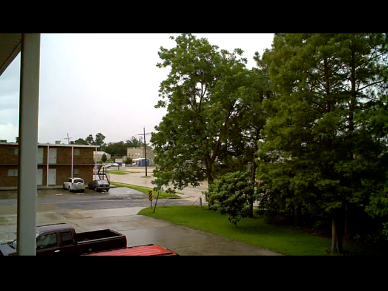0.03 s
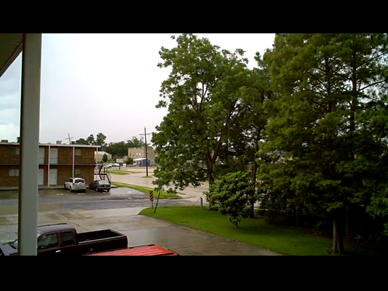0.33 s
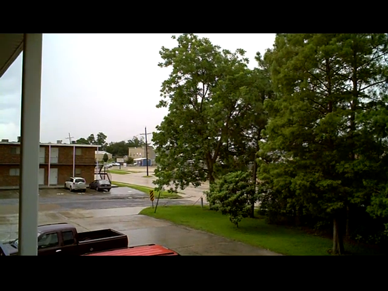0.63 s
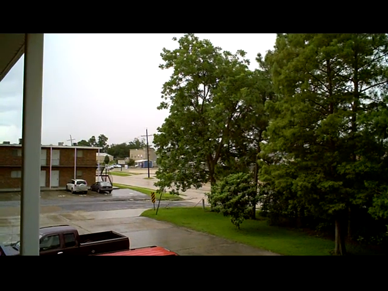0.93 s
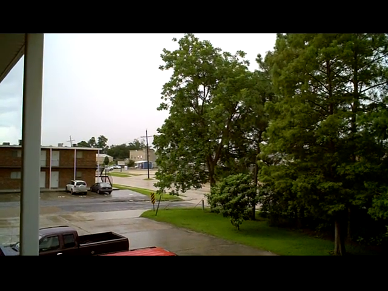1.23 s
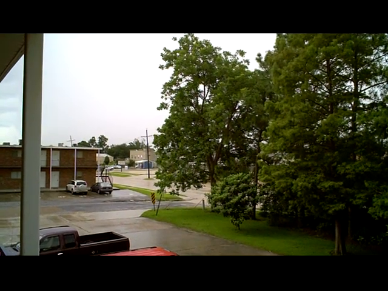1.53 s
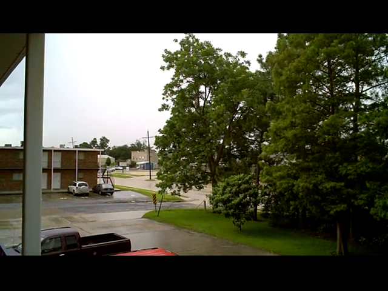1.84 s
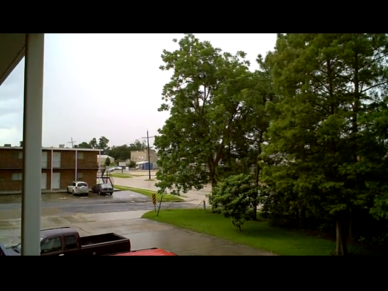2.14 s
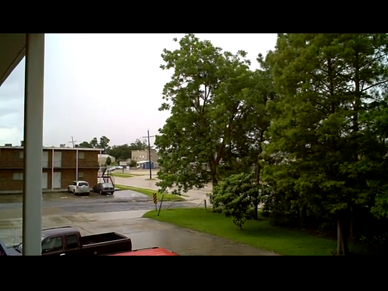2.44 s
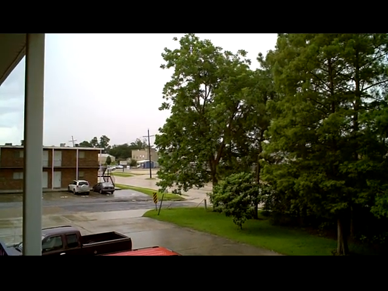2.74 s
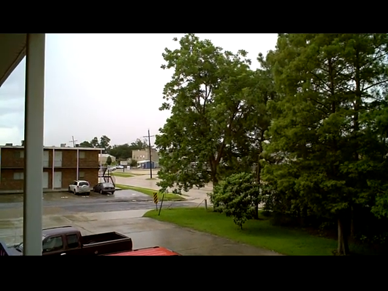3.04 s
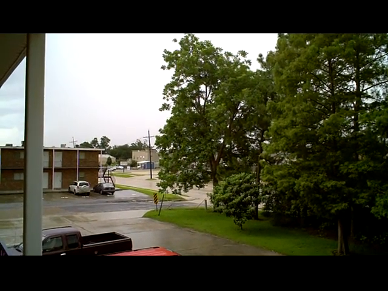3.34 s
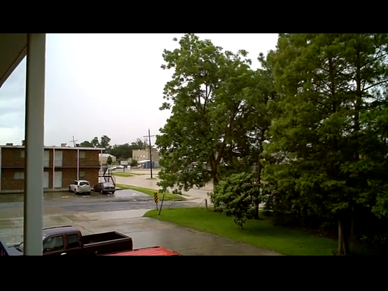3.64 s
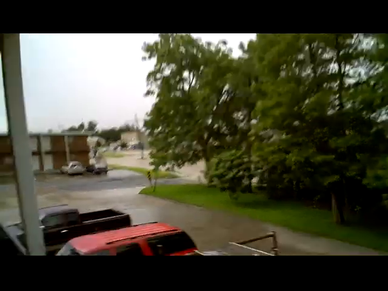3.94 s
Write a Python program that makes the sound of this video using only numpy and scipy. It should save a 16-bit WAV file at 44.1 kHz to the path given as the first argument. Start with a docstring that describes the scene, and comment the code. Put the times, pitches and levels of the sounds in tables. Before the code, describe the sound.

A close thunder crack bursts suddenly after a few seconds of soft, steady rain.

```python
"""A very near lightning strike in steady rain, heard from a porch.
Rain washes over a street and trees, low wind gusts, a few drops splash close by.
Sparks rise to a sizzle and end in two sharp snaps; buildings scatter them and the porch rings.
Then shock waves from along the channel pile up, overload the microphone and briefly pin it silent."""
import sys
import numpy as np
from scipy import signal
from scipy.fft import rfft, irfft, next_fast_len
from scipy.io import wavfile

SR = 44100
rng = np.random.default_rng(int(sys.argv[2]) if len(sys.argv) > 2 else 0)


def pcm_store(signal):
    """Save signal as 16-bit PCM."""
    levels = np.round(np.clip(np.atleast_2d(signal), -1, 1) * 32767)
    wavfile.write(sys.argv[1], SR, levels.astype(np.int16).T)


N = 176400
TIME_S = np.arange(N) / SR

# distant rain: freq_hz, relative_db
WASH_SPECTRUM = [(40, 7), (80, 3.5), (340, 3), (650, 0), (860, -0.5), (1000, -3.5), (1380, -7), (1630, -7),
                 (1830, -11.5), (2400, -17.5), (3400, -20), (5300, -26.5), (8000, -30), (12000, -36),
                 (15500, -36)]
# distant rain: time_s, level_db
WASH_ENVELOPE = [(.17, -39), (.55, -38.5), (1.28, -40), (1.65, -39), (1.88, -40), (2.05, -39), (2.2, -40),
                 (2.95, -40.3), (3.7, -39.5)]
# small drops on paving: freq_hz, relative_db
PATTER_SPECTRUM = [(500, 4), (1500, -2), (3500, -7), (6000, -3.5), (9000, -14), (12000, -17), (15500, -19)]
# faint tones in the wash: pitch_hz, width_hz, level_db
WASH_TONES = [(238.7, 15, -53), (497.5, 37, -56), (823, 32, -62.5), (5330, 260, -75)]
# wind rush: freq_hz, relative_db
WIND_SPECTRUM = [(40, -7), (130, -10.5), (180, -2.5), (235, -1.5), (290, -1.5), (320, -11), (450, -17.5),
                 (1000, -32.5), (4000, -68)]
# gusts: time_s, level_db
GUST_ENVELOPE = [(.17, -43.5), (.85, -39.5), (1.05, -43), (1.2, -41.5), (1.37, -47), (1.55, -44),
                 (1.87, -47), (2.3, -42.5), (2.7, -52), (2.82, -44), (3.05, -48), (3.7, -43.5)]
# near drops: start_s, relative_db, centre_hz
NEAR_DROPS = [(.559, -48, 5800), (.615, -55, 9000), (.861, -47, 13000), (.917, -53, 7500),
              (1.233, -48, 6500), (1.321, -48, 5400), (1.447, -48, 8000), (1.492, -47, 7500),
              (1.541, -53, 10000), (1.575, -47, 5600), (1.682, -44, 7000), (1.788, -44, 9500),
              (2.344, -51, 7500), (2.685, -48, 6300), (2.778, -44, 10500), (3.026, -46, 7500),
              (3.386, -49, 6500), (3.460, -47, 8500)]
# sparks before the strike: time_s, level_db
SIZZLE_ENVELOPE = [(3.57, -93), (3.61, -69), (3.655, -55), (3.675, -51), (3.716, -48.5), (3.74, -70)]
# sparks: freq_hz, relative_db
SIZZLE_SPECTRUM = [(300, -16), (1500, 1), (4000, 2), (10000, -5), (15500, -7)]
# discharge snaps: start_s, level_db, length_s
SNAP_BURSTS = [(3.7076, -41, .0008), (3.718, -17.5, .001), (3.7561, -22, .0006), (3.757, -29, .0025)]
# snaps: freq_hz, relative_db
SNAP_SPECTRUM = [(150, -2), (1000, 6), (2000, 5), (7500, -1.5), (10000, -7), (15500, -11)]
# echoes off walls and trees: time_s, level_db
ECHO_ENVELOPE = [(3.717, -70), (3.72, -30.5), (3.731, -28.5), (3.748, -34), (3.76, -33), (3.785, -36.5),
                 (3.80, -38), (3.83, -34)]
# echoes: freq_hz, relative_db
ECHO_SPECTRUM = [(100, 7), (250, 8), (430, 7), (650, 4), (950, 5), (1400, 6.5), (2500, 3.8), (4500, 3),
                 (7500, 1.5), (10000, -4.5), (12000, -10), (15500, -12)]
# porch resonances: pitch_hz, width_hz, level_db
PORCH_MODES = [(460, 20, -21), (790, 16, -29), (955, 16, -26.5), (1325, 16, -32)]
# first mutter of thunder: time_s, level_db
MUTTER_ENVELOPE = [(3.79, -53), (3.812, -30), (3.819, -35), (3.828, -21)]
# mutter: freq_hz, relative_db
MUTTER_SPECTRUM = [(100, -12), (800, 0), (1700, -6), (2800, -22), (15500, -55)]
# shock waves: freq_hz, relative_db
SHOCK_SPECTRUM = [(60, -6), (200, -1), (450, -0.5), (900, -2.5), (1500, -10.5), (3000, -25), (6000, -33),
                  (15500, -55)]
# bright tearing behind the first shocks: time_s, level_db
TEARING_ENVELOPE = [(3.827, -11), (3.86, -6), (3.9, -6), (3.935, -6), (3.98, -10), (4.0, -12.5)]
# tearing and cracks: freq_hz, relative_db
TEARING_SPECTRUM = [(300, -6), (900, 5), (2000, 4), (3500, -1), (7000, -1.5), (10000, -7.5), (15500, -18)]
# single sharp cracks: start_s, level_db
CRACK_BURSTS = [(3.8315, 4), (3.8572, 22), (3.874, 2), (3.915, 1), (3.9295, 2), (3.9538, 2), (3.9722, 5)]
# huge slow waves: start_s, length_s
SURGE_WAVES = [(3.8425, .0182), (3.980, .0052)]
# microphone response: freq_hz, gain_db
MIC_RESPONSE = [(40, -2), (130, -2), (250, 0), (1000, 0), (3000, 0.5), (7000, -1.5), (10000, -4.5),
                (12000, -8.5), (15500, -14)]


def from_db(db):
    """Decibels to gain."""
    return 10 ** (np.asarray(db) / 20)


def unit_rms(x):
    """Scale to unit power."""
    return x / np.sqrt(np.mean(x ** 2) + 1e-20)


def envelope(rows, outside_db=-150):
    """Gain along (time_s, level_db); outside_db=None holds the end values."""
    time_s, level_db = np.transpose(rows)
    return from_db(np.interp(TIME_S, time_s, level_db, left=outside_db, right=outside_db))


def shaped(x, spectrum):
    """Minimum-phase filter along (freq_hz, gain_db)."""
    freq_hz, gain_db = np.transpose(spectrum)
    size = next_fast_len(2 * N)
    grid_hz = np.maximum(np.arange(size // 2 + 1) * SR / size, 1)
    gain = from_db(np.interp(np.log(grid_hz), np.log(freq_hz), gain_db))
    cepstrum = irfft(np.log(gain), size)
    cepstrum[1:size // 2] *= 2
    cepstrum[size // 2 + 1:] = 0
    return irfft(rfft(x, size) * np.exp(rfft(cepstrum)), size)[..., :N]


def resonance(x, centre_hz, width_hz):
    """Two-pole band-pass."""
    radius = np.exp(-np.pi * width_hz / SR)
    feedback = [1, -2 * radius * np.cos(2 * np.pi * centre_hz / SR), radius * radius]
    return signal.lfilter([1, 0, -1], feedback, x)


def noise(spectrum):
    """Coloured noise at unit power."""
    return unit_rms(shaped(rng.standard_normal(N), spectrum))


def clicks(spectrum, rate_per_s, spread_db):
    """Coloured random impulses, many small and few large, at unit power."""
    sizes = from_db(spread_db * np.minimum(rng.exponential(1, N), 5))
    impulses = (rng.random(N) < rate_per_s / SR) * sizes * rng.choice([-1, 1], N)
    return unit_rms(shaped(impulses, spectrum))


def gate(start_s, length_s):
    """Rectangular window."""
    return (TIME_S >= start_s) & (TIME_S < start_s + length_s)


def rain(patter_db=-66.5, patter_db_per_s=-.5):
    """Far drops merge into a wash with faint tones; nearer ones patter on paving."""
    wash = envelope(WASH_ENVELOPE, outside_db=None) * noise(WASH_SPECTRUM)
    patter_gain = from_db(patter_db + patter_db_per_s * TIME_S)
    patter = patter_gain * clicks(PATTER_SPECTRUM, rate_per_s=500, spread_db=5.5)
    tones = np.zeros(N)
    for pitch_hz, width_hz, level_db in WASH_TONES:
        band = resonance(rng.standard_normal(N), pitch_hz, width_hz)
        tones += from_db(level_db) * unit_rms(resonance(band, pitch_hz, width_hz))
    return wash + patter + tones


def wind():
    """A low rush swells and sinks with the gusts."""
    return envelope(GUST_ENVELOPE, outside_db=None) * noise(WIND_SPECTRUM)


def drips(t60_s=.016, splash_q=2.2, trim_db=-4.5):
    """Each near drop makes a bright splash that dies at once."""
    splashes = np.zeros(N)
    spray = rng.standard_normal(N)
    for start_s, relative_db, centre_hz in NEAR_DROPS:
        age_s = np.clip(TIME_S - start_s, 0, 1)
        decay = from_db(-60 * age_s / t60_s) * (TIME_S >= start_s)
        splash = unit_rms(resonance(spray, centre_hz, centre_hz / splash_q))
        splashes += from_db(relative_db + trim_db) * decay * splash
    return splashes


def discharge():
    """Sparks swell to a sizzle and end in snaps, scattered by walls and trees."""
    sizzle = envelope(SIZZLE_ENVELOPE) * clicks(SIZZLE_SPECTRUM, rate_per_s=1800, spread_db=3.5)
    bursts = sum(from_db(level_db) * gate(start_s, length_s)
                 for start_s, level_db, length_s in SNAP_BURSTS)
    snaps = bursts * noise(SNAP_SPECTRUM)
    echoes = envelope(ECHO_ENVELOPE) * clicks(ECHO_SPECTRUM, rate_per_s=9000, spread_db=1.5)
    return sizzle + snaps + echoes


def porch_ring(start_s=3.724, rise_s=.006):
    """Damped porch modes ring briefly as the echoes arrive."""
    age_s = np.maximum(TIME_S - start_s, 0)
    ring = np.zeros(N)
    for pitch_hz, width_hz, level_db in PORCH_MODES:
        decay = np.exp(-np.pi * width_hz * age_s)
        ring += from_db(level_db) * decay * np.sin(2 * np.pi * pitch_hz * age_s)
    return ring * (1 - np.exp(-age_s / rise_s))


def thunder(shock_start_s=3.8274, shock_db=12.3, shock_db_per_s=-32, crack_length_s=.0013):
    """A mutter, then shocks from all along the channel pile up, with tearing and sharp cracks."""
    age_s = np.maximum(TIME_S - shock_start_s, 0)
    shock_gain = (age_s > 0) * from_db(shock_db + shock_db_per_s * age_s)
    shocks = shock_gain * clicks(SHOCK_SPECTRUM, rate_per_s=3000, spread_db=3.6)
    tearing = envelope(TEARING_ENVELOPE) * clicks(TEARING_SPECTRUM, rate_per_s=6000, spread_db=2.5)
    bursts = sum(from_db(level_db) * gate(start_s, crack_length_s) for start_s, level_db in CRACK_BURSTS)
    cracks = bursts * noise(TEARING_SPECTRUM)
    mutter = envelope(MUTTER_ENVELOPE) * noise(MUTTER_SPECTRUM)
    return mutter + shocks + tearing + cracks


def surges(first_db=29.5, slope_db_per_s=-80):
    """Huge slow pressure waves: each a push, then suction."""
    first_s = SURGE_WAVES[0][0]
    pressure = np.zeros(N)
    for start_s, length_s in SURGE_WAVES:
        peak = from_db(first_db + slope_db_per_s * (start_s - first_s))
        phase_cycles = np.clip((TIME_S - start_s) / length_s, 0, 1)
        pressure += peak * np.sin(2 * np.pi * phase_cycles)
    return pressure


def scene():
    """Mono sound pressure at the porch."""
    return (rain() + wind() + drips() + discharge() + porch_ring() + thunder() + surges())[None]


def record(dry):
    """The capsule saturates, a low cut turns its flat tops into spikes, the amplifier rounds them off."""
    switch_on_s = .165
    capsule_limit, capsule_leak = .85, .0045
    low_cut_hz, low_cut_q, high_cut_hz = 350, .54, 15750
    amp_ceiling, amp_knee = .94, 4.6
    pressure = dry * (TIME_S >= switch_on_s)
    capsule = capsule_limit * np.tanh(pressure / capsule_limit) + capsule_leak * pressure
    corner_rad_per_s = 2 * np.pi * low_cut_hz
    low_cut = signal.bilinear([1, 0, 0], [1, corner_rad_per_s / low_cut_q, corner_rad_per_s ** 2], SR)
    mic = shaped(signal.lfilter(*low_cut, capsule), MIC_RESPONSE)
    limited = mic / (1 + np.abs(mic / amp_ceiling) ** amp_knee) ** (1 / amp_knee)
    high_cut = signal.ellip(10, .1, 70, high_cut_hz, fs=SR, output="sos")
    return signal.sosfilt(high_cut, limited)


dry = scene()
out = record(dry)
pcm_store(out)
```